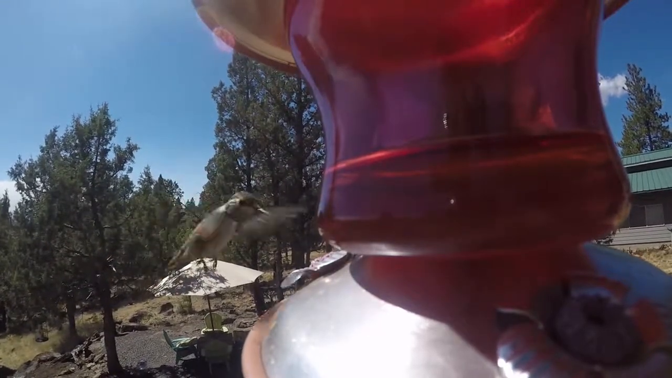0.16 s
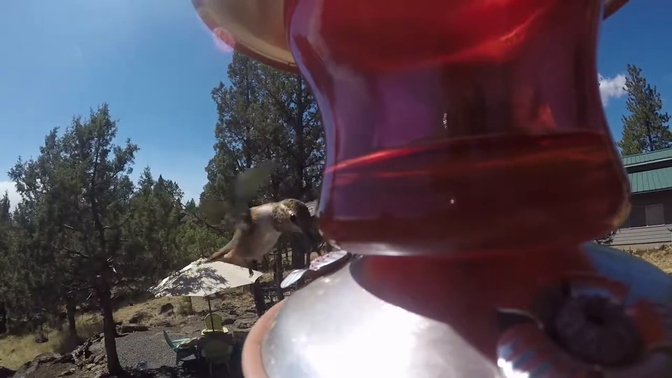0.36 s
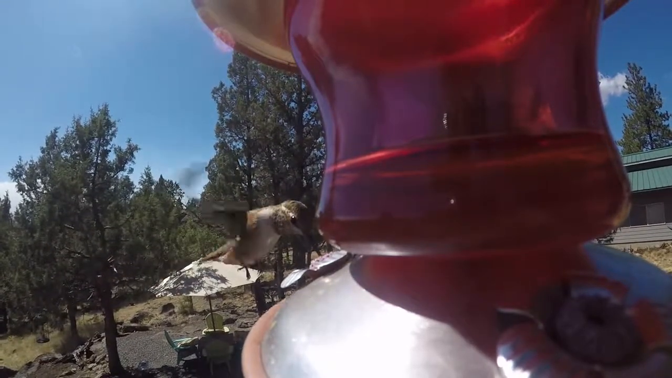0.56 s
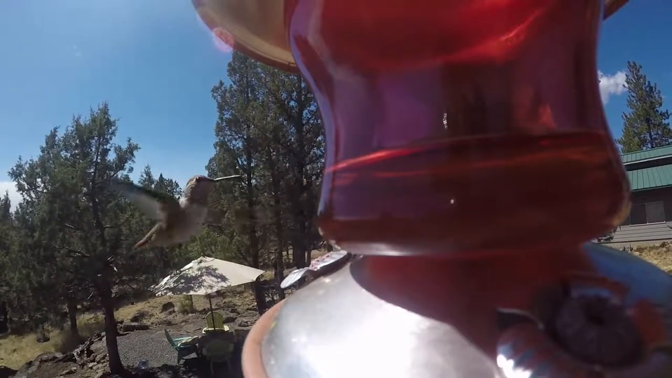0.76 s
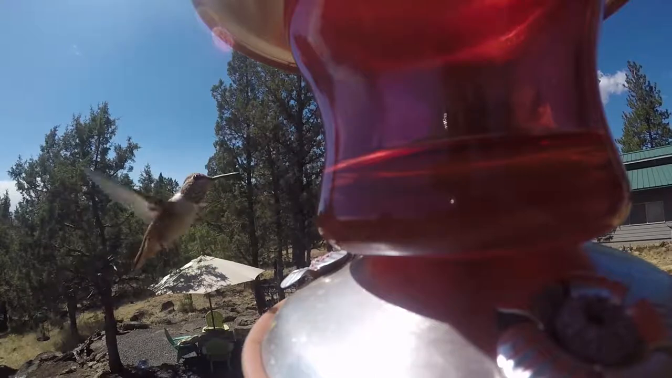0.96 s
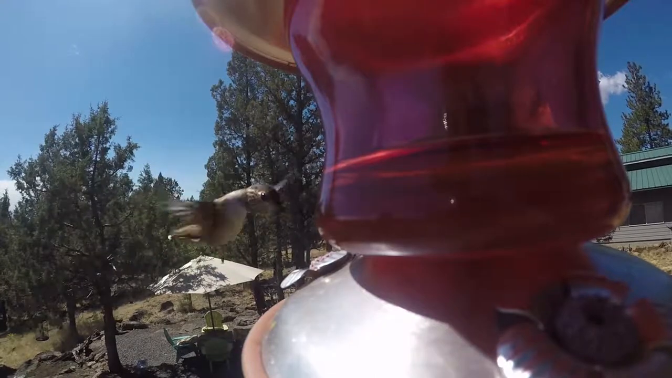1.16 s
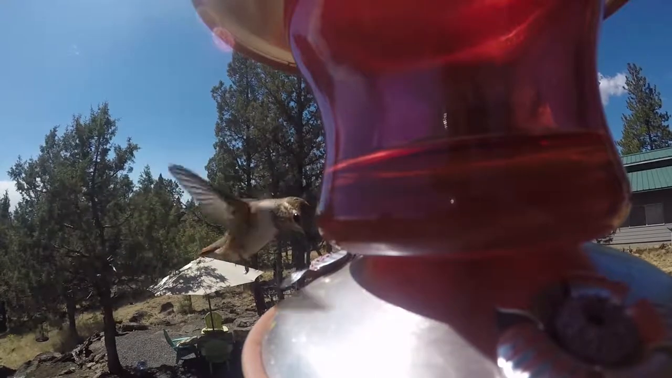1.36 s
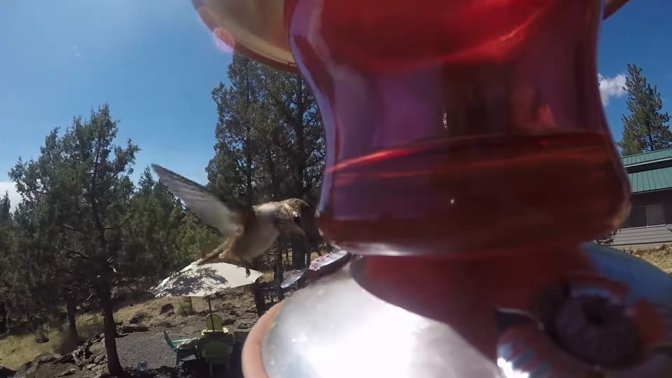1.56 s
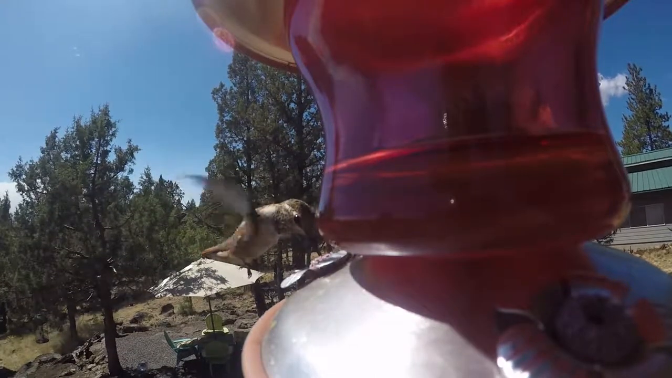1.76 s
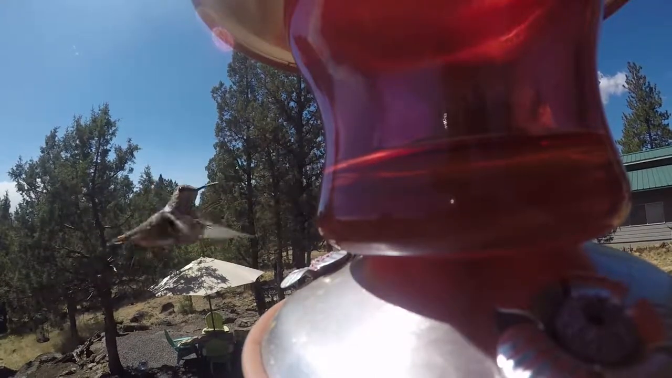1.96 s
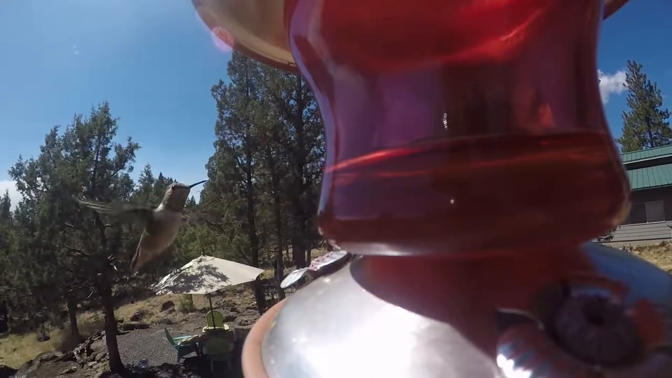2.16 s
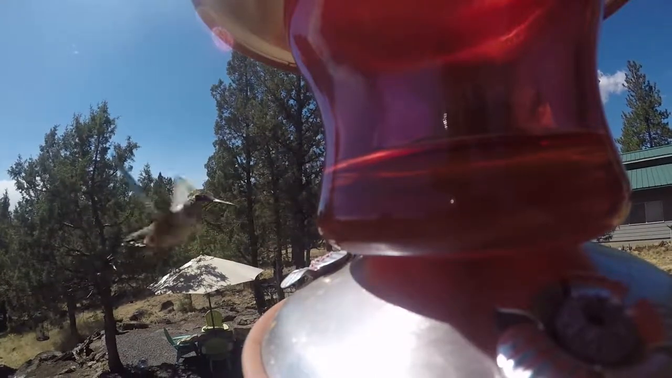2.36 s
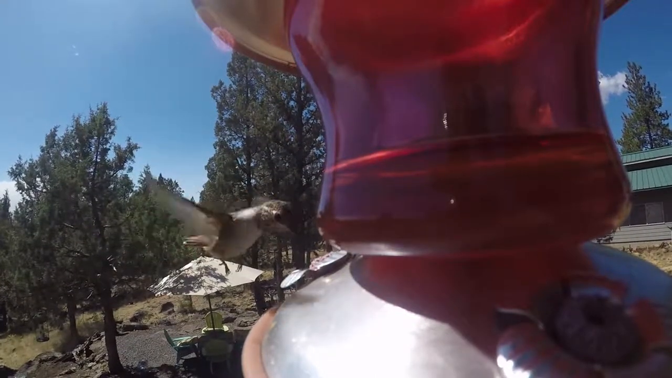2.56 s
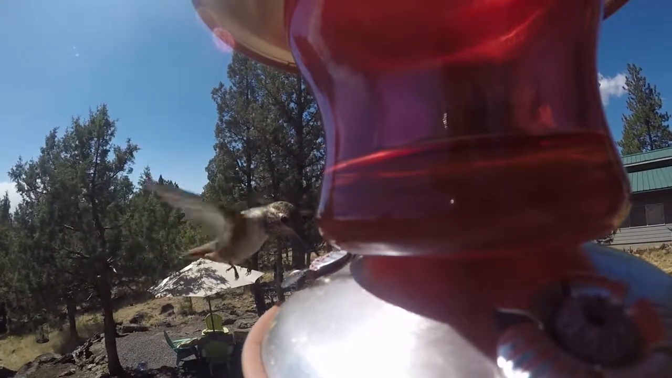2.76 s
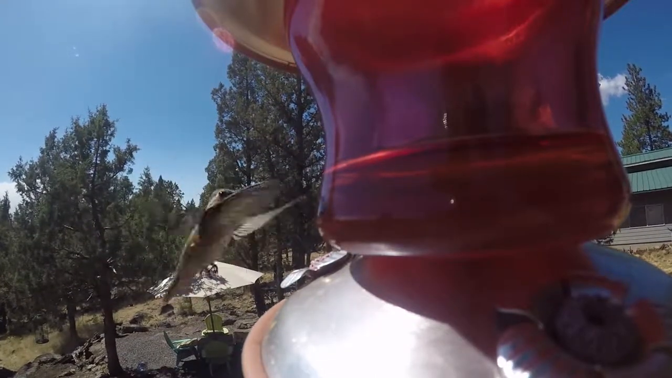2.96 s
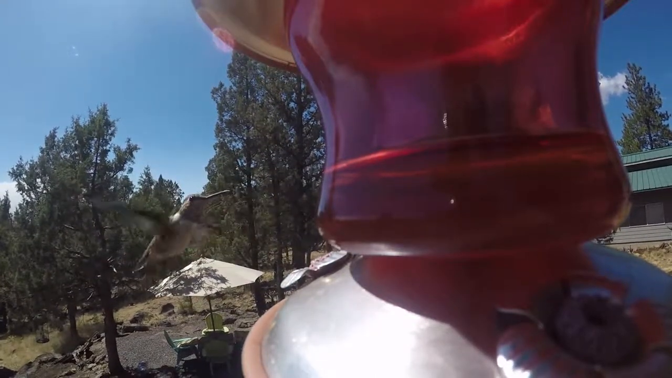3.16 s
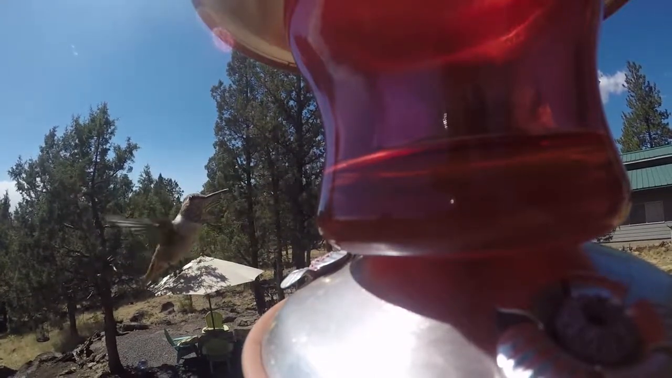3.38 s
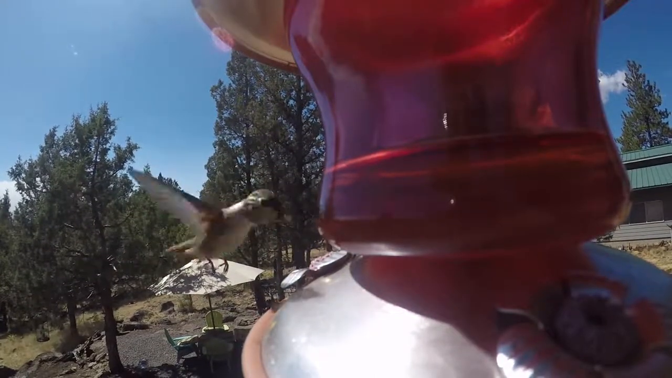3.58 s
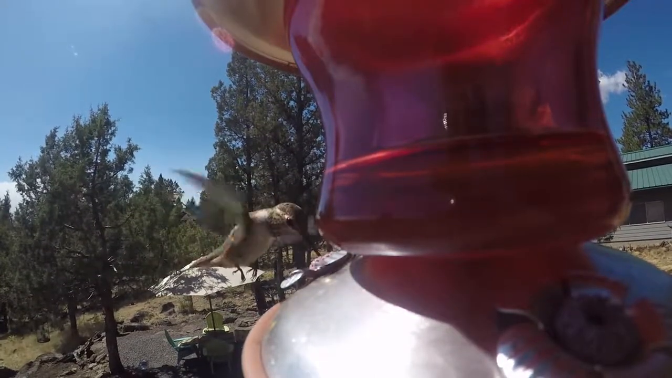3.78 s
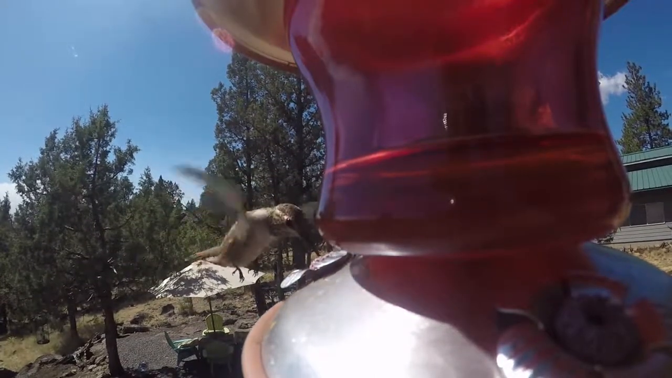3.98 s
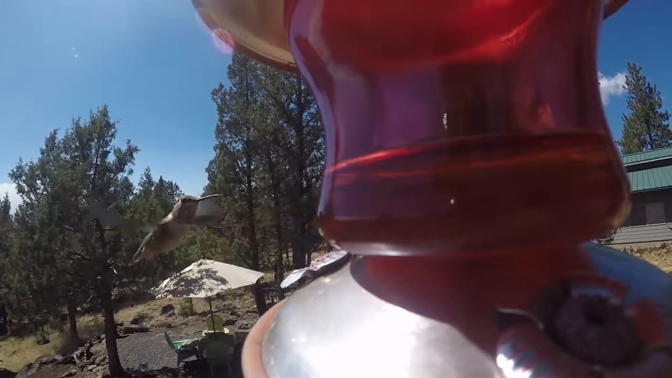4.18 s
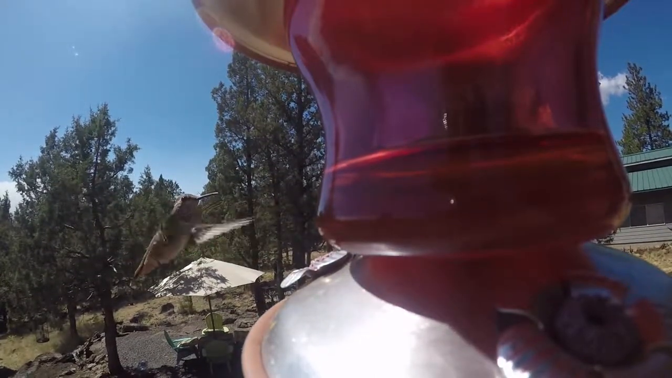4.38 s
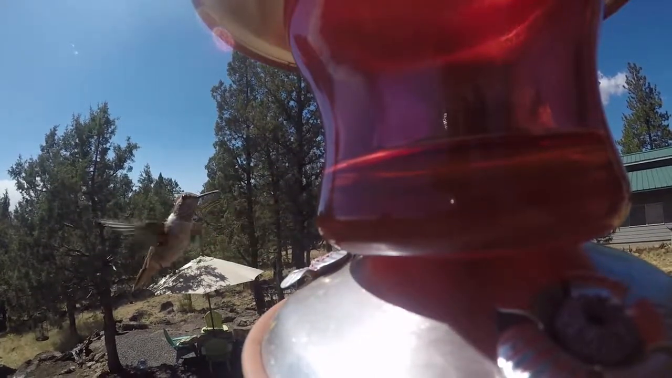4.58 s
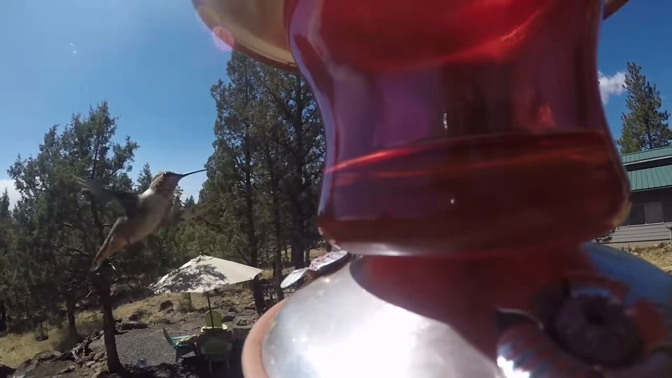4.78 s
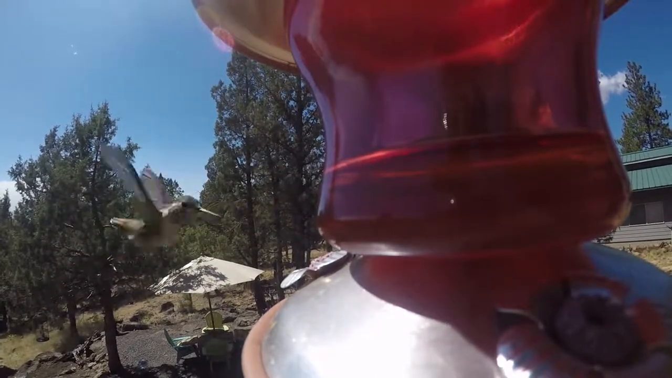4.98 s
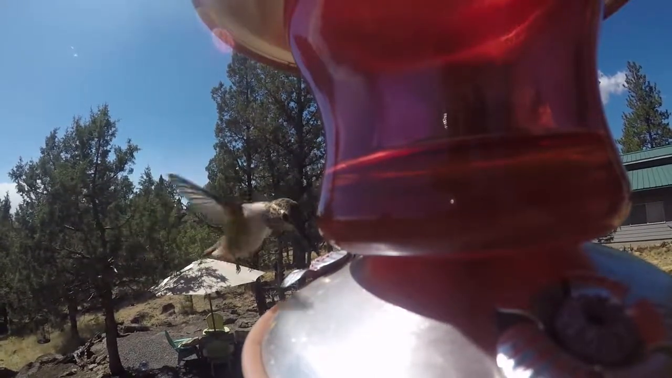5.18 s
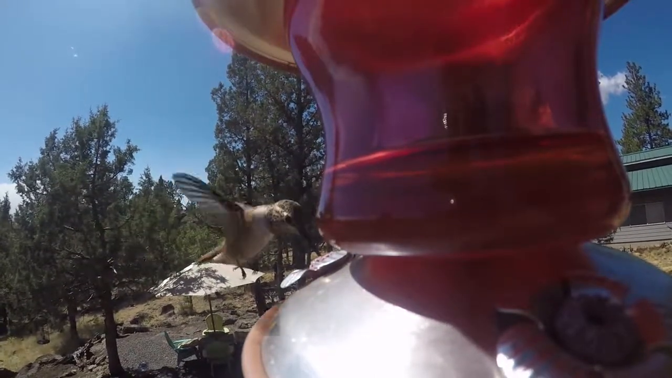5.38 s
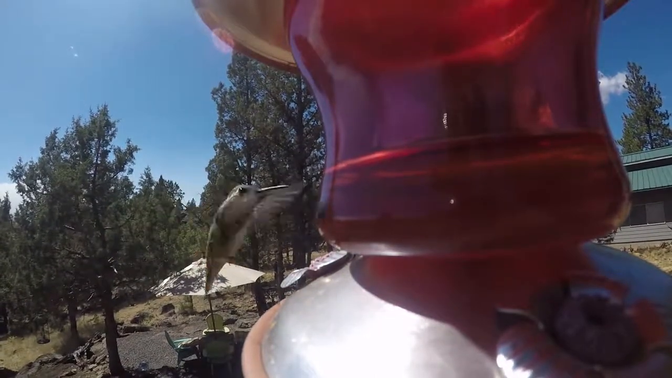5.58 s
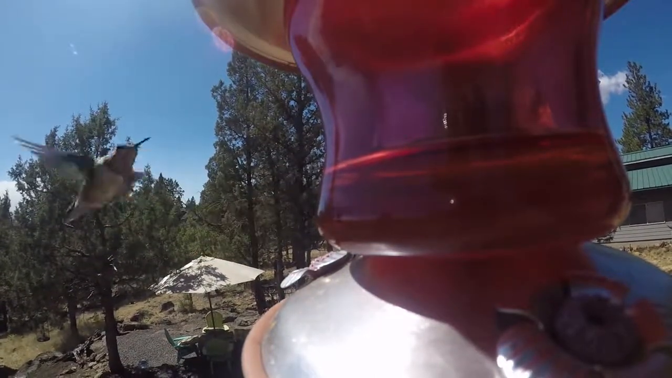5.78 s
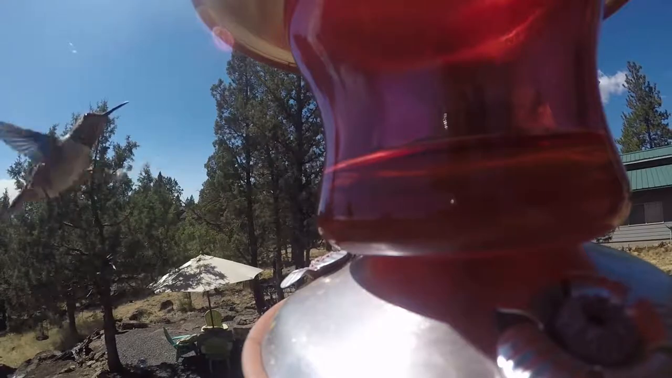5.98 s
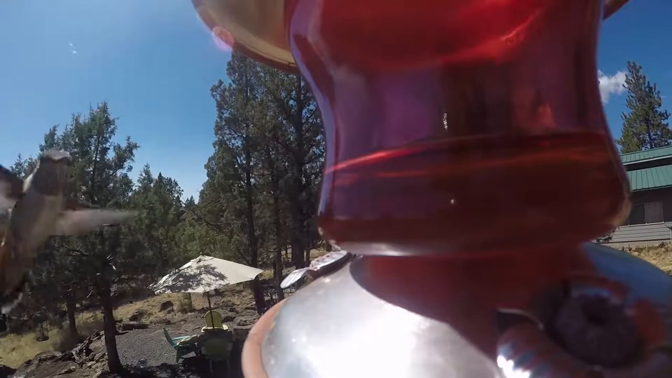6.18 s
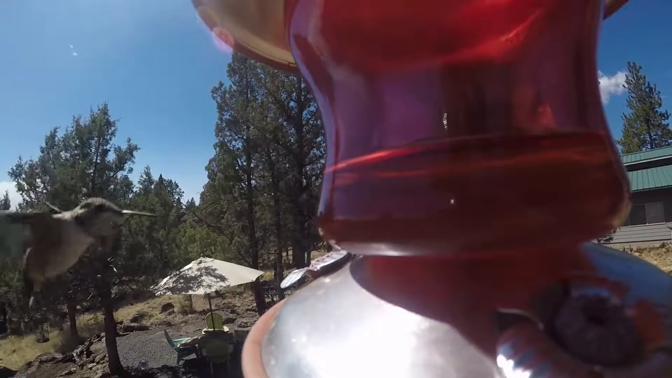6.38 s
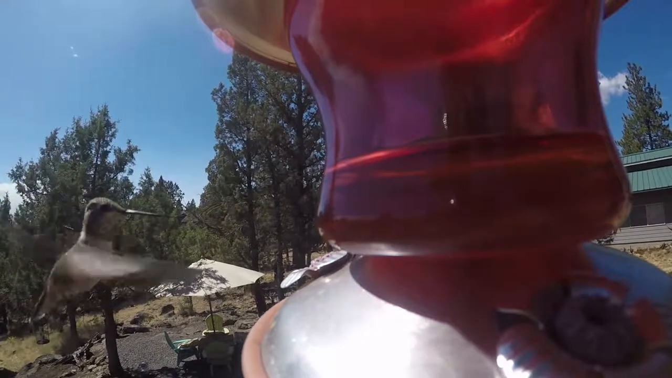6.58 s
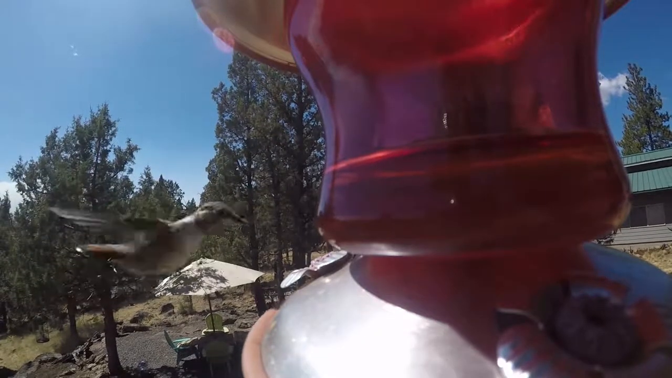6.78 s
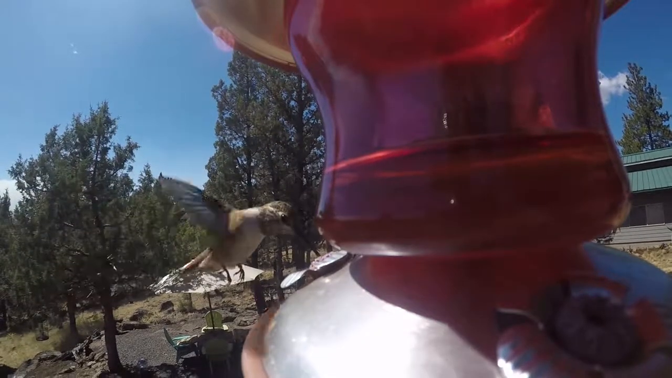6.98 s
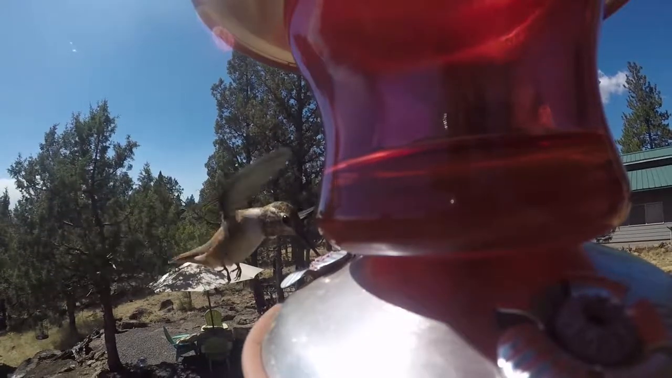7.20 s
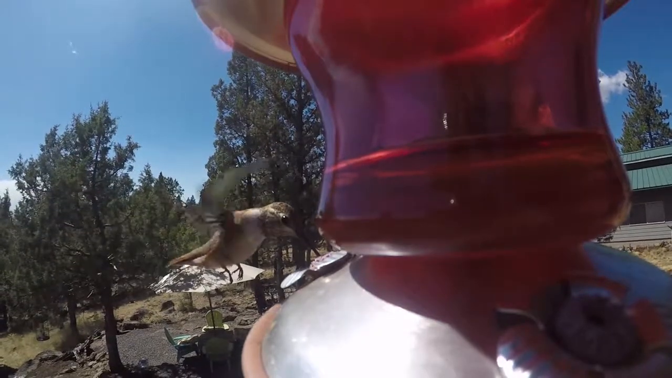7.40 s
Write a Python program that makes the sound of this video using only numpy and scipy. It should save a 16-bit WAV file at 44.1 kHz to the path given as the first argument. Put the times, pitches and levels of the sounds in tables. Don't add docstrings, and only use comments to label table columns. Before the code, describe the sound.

Outdoors, very close to a small camera microphone, a hummingbird hovers beside a feeder. Its low, fluttering wing hum swells and rises in pitch with each darting sip, then thins as it backs off. Ten brief, sharp chips punctuate it. A wing lightly knocks the feeder midway; later the bird banks past with louder, rawer flicks and settles into a long final sip. Faint hiss remains underneath.

```python
import sys
import numpy as np
from scipy import signal
from scipy.fft import rfft, irfft
from scipy.io import wavfile
from scipy.ndimage import uniform_filter1d

SR = 44100
rng = np.random.default_rng(int(sys.argv[2]) if len(sys.argv) > 2 else 0)


def invert_db(level):
    return 10 ** (np.asarray(level, dtype=float) / 20)


def dump_mix(stems):
    frames = np.atleast_2d(stems).T
    limited = np.clip(frames, -1, 1)
    pcm = np.round(limited * 32767).astype(np.int16)
    wavfile.write(sys.argv[1], SR, pcm)


N = 328104

# arrive_s, leave_s, brake_surge_hz, push_surge_hz, lift_db
SIPS = [
    (0.29, 0.648, 3.4, 4.62, -25.5),
    (1.246, 1.868, 4.12, 3.65, -26.5),
    (2.526, 2.925, 2.08, 4.226, -34),
    (3.686, 4.029, 2.61, 3.93, -32),
    (5.159, 5.56, 2.893, 6.48, -29),
    (6.854, 7.464, 1.21, 0.8, -25),
]
# from_s, to_s, beat_hz, flick_db, double_swing_db
HOVERS = [(-.05, 0.174, 47.65, -43, -31), (0.769, 1.133, 46.65, -47.5, -31.5),
          (2.125, 2.35, 46.24, -37, -44), (3.17, 3.34, 46.02, -42.5, -66), (3.413, 3.585, 47.5, -45, -52),
          (4.338, 4.56, 46.53, -35.5, -47), (4.566, 4.67, 46.95, -33.5, -32.5),
          (4.744, 5.042, 46.01, -42, -33.5), (5.678, 5.768, 46.12, -35, -39.5),
          (5.794, 6.076, 45.8, -28, -25.5), (6.171, 6.336, 46.33, -22.5, -24),
          (6.35, 6.439, 46.22, -24, -25), (6.45, 6.682, 47.19, -30.5, -27)]
# at_s, swing_db, double_swing_db, flick_db
TWISTS = [(0.76, -45, -34, -46), (1.1, -58, -39, -43), (1.72, -44, -68, -45), (2.04, -50, -40, -47),
          (2.99, -45, -32, -52), (3.64, -52, -51, -39), (4.1, -45, -27.5, -51), (5.23, -37, -67, -35),
          (5.411, -21.5, -49, -67), (5.45, -49, -32, -73), (5.64, -33, -30, -37), (6.111, -26, -30.5, -53),
          (6.73, -28, -16, -29)]
# at_s, extra_beat_hz
LUNGES = [
    (1.72, 0.93),
    (2.2, 0.9),
    (4.37, 1.28),
    (4.64, 1.22),
    (5.84, .8),
    (6.211, 4.84),
    (6.40, 1.56),
    (7.27, 1.23),
]
# at_s, level_db
NEARNESS = [(0, 0.5), (.45, -0.5), (.9, -1), (1.4, -1), (1.65, -1.5), (2.0, 0), (2.6, -1), (2.8, -2),
            (3.3, 2), (3.85, -3.5), (4.2, 0), (4.85, -5), (5.3, -3.5), (5.95, -1), (6.3, 0), (6.6, -1.5),
            (7.0, 0), (7.44, 0)]
# swing_db, double_swing_db, flick_db, snap_db
IDLE_DB = (-46.5, -43.5, -44, -52)
SURGE_DB_PER_HZ = (2.3, 0.82, 1.43, 1.4)
# multiple, layer_index (0 swing to 3 snap), level_db, pan_share, left_lag_rad
BEAT_MULTIPLES = [(1, 0, -1.5, 3, 0.97), (2, 1, -0.5, 0.23, 0.46), (3, 2, -2, 2.53, 0.27), (4, 2, -4, 3, 1),
                  (5, 3, -3, -5.9, 0.27), (6, 3, -5, -2, 0.76), (7, 3, -9.5, -0.7, 0.47), (8, 3, -9, 2, 1),
                  (9, 3, -14, -2.5, 0.33), (10, 3, -16, 3, 0.82), (11, 3, -20.5, 3.1, 0.54),
                  (12, 3, -25.5, 4, 0.55)]
FACING_DB = [0, 0, 1, 0, -10, 1.5, -1.5, .5, 0, .5, 0, 0]
# at_s, swing_rad, flick_rad
REBOUND = [(0, .85, 1.7), (5.6, .85, 1.7), (6.12, .5, 1.1), (6.42, .5, 1.1), (6.6, .7, 1.9),
           (7.44, .6, 1.9)]
# freq_hz, level_db_per_hz
DOWNWASH = [(12, -32), (25, -8), (45, -2.5), (80, -4), (150, -5), (300, -16), (500, -26), (900, -53.5)]
# freq_hz, level_db_per_hz
RUSTLE = [(150, -20), (300, 3), (500, 2), (700, -3), (1000, 0), (1500, -9), (2500, -15), (4000, -19),
          (7000, -25), (10000, -38), (16000, -70)]
# at_s, rustle_db
RUFFLES = [(0.521, -63), (1.3, -70), (1.64, -62), (2.48, -60), (2.572, -66), (3.52, -65), (3.87, -60),
           (5.08, -62), (5.391, -75), (5.471, -83), (6.22, -52), (6.38, -54), (6.74, -51)]
# start_s, peak_db, length_ms, knee_hz, head_left_minus_right_db
CHIPS = [
    (0.1716, -15, 20.3, 3250, 2.5),
    (0.7439, -13, 23.6, 3750, 4),
    (1.9516, -13.5, 22.3, 3560, 3),
    (2.4364, -16, 21, 3080, 3.5),
    (3.4939, -12, 21.2, 3580, 1.5),
    (4.1508, -14.5, 24.5, 3728, 3.5),
    (5.0224, -13, 22.4, 3620, 3),
    (5.6683, -13, 22.9, 3826, 3.5),
    (6.1529, -15, 22.65, 3300, -1),
    (6.7764, -15, 22.5, 3300, 4.5),
]
# freq_hz, level_db, db_per_head_db, db_per_knee_khz
BEAM = [(3300, -4.5, 1.99, -1.5), (5170, 2.5, -1.45, -11), (7700, -6, 0.87, -2.5)]
# freq_hz, left_db, right_db
PORTS = [(1460, -17, -18.5), (2290, -12, -9), (2600, -15, -8.5), (3250, -7, -2), (4300, -10.5, -9.5),
         (5150, -3, -7), (6400, 7, 1.5), (7200, -2.5, 0.5), (7690, 6.5, 8.5), (8100, -6.5, -4),
         (9670, -19.5, -4.5), (10700, -25, -14.5), (13400, -26.5, -16), (15800, -44.5, -39.5)]
# at_s, peak_db, pitch_hz, length_ms
BRUSHES = [
    (2.571, -30, 490, 5),
    (2.574, -26, 285, 8),
    (5.4, -43, 700, 2.9),
]
# freq_hz, correlation
LIKENESS = [(30, 0.19), (200, 0.12), (600, -0.6), (1400, -0.53), (3000, 0.6), (5000, 0.62), (7500, 0.093),
            (14000, 0.21)]
# freq_hz, left_db_per_hz, right_db_per_hz
HISS = [(600, -6, -29.5), (1310, 0.5, 1.5), (1800, 6, 6), (3600, -1, 2.5), (5000, -3, -8.5), (5360, -6, 2),
        (6100, 4.5, 2), (7200, 5.5, 5.5), (8100, -3, 1), (10240, -3, 1.5), (10470, -41, -0.5),
        (12000, -59.5, -8), (13400, -50, -23), (16000, -32, -38)]


def on_log(hz, table, column=1):
    table = np.array(table)
    return np.interp(np.log(hz + 1), np.log(table[:, 0]), table[:, column])


def colour(x, table, column=1):
    gain_db = on_log(np.fft.rfftfreq(N, 1 / SR), table, column)
    cepstrum = irfft(np.log(invert_db(gain_db)), N)
    cepstrum[1:N // 2] *= 2
    cepstrum[N // 2 + 1:] = 0
    return irfft(rfft(x) * np.exp(rfft(cepstrum)), N)


def treble(x, cutoff_hz):
    return signal.sosfilt(signal.butter(2, cutoff_hz, "high", fs=SR, output="sos"), x)


def automation(table):
    s, *curves = np.transpose(table)
    return [np.interp(np.arange(N) / SR, s, c) for c in curves]


def pan(db):
    return invert_db(np.array([db / 2, -db / 2]))


def held(from_s, to_s, release_s, ease_s=0.062):
    t = np.arange(N) / SR
    rise = (t - from_s[:, None]) / ease_s
    fall = (to_s[:, None] - t) / release_s
    ramp = np.clip(np.minimum(rise, fall) + .5, 0, 1)
    return ramp * ramp * (3 - 2 * ramp)


def bumps(s, rise_s, fall_s):
    since = np.arange(N) / SR - s[:, None]
    return np.exp(-(since / np.where(since < 0, rise_s, fall_s)) ** 2)


def per_beat(turns, spread):
    return spread * np.interp(turns, np.arange(500), rng.standard_normal(500))


def air_noise(table, lo_hz, hi_hz):
    hz = np.fft.rfftfreq(N, 1 / SR)
    alike = np.clip(on_log(hz, LIKENESS), -.95, .95)
    mid, side = rfft(rng.standard_normal((2, N))) * invert_db(on_log(hz, table))
    side = side * np.sqrt((1 - alike) / (1 + alike))
    band = (hz > lo_hz) & (hz < hi_hz)
    rms = np.sqrt(2 * np.sum(abs(mid[band]) ** 2)) / N
    return irfft(np.array([mid + side, mid - side]), N) / rms


def flight():
    sip_hz, idle_hz, idle_weight = 49.97, 45.8, .3
    lead_s, trail_s, retreat_s = .09, .09, 0.1974
    snap_db = -9
    arrive, leave, brake, push, lift_db = np.transpose(SIPS)
    from_s, to_s, hover_hz, flick_db, double_db = np.transpose(HOVERS)
    twist_s, *twist_db = np.transpose(TWISTS)
    lunge_s, lunge = np.transpose(LUNGES)
    sip = held(arrive - lead_s, leave + trail_s, retreat_s)
    hover = held(from_s, to_s, 0.062)
    surge = np.r_[brake, push, lunge] @ bumps(np.r_[arrive, leave, lunge_s], .04, .055)
    near = sip.sum(axis=0)

    idle = idle_weight * (1 - near)
    hz = (sip_hz * near + hover_hz @ hover + idle_hz * idle) / (near + hover.sum(axis=0) + idle) + surge

    same = np.ones(len(SIPS))
    sip_db = [lift_db - 7, lift_db, -38 * same, -47.5 * same]
    swing_db = flick_db + 1.5 + 0.54 * (double_db - flick_db)
    hover_db = [swing_db, double_db, flick_db, flick_db + snap_db]
    twist_db = [*twist_db, twist_db[-1] + snap_db]
    gains = invert_db(np.array(sip_db)) @ sip * invert_db(np.outer(SURGE_DB_PER_HZ, surge))
    gains = gains + invert_db(np.array(hover_db)) @ hover * invert_db(0.77 * surge)
    gains = gains + invert_db(np.array(twist_db)) @ bumps(twist_s, 0.034, 0.034)
    gains = gains + invert_db(np.array(IDLE_DB))[:, None]
    return hz, gains * invert_db(automation(NEARNESS)[0]), near, surge


def wings(hz, gains, near, surge):
    pan_hover_db, pan_sip_db, pan_db_per_hz = 1, 5, -0.12
    swing_lead, flick_lead = automation(REBOUND)
    turns = np.cumsum(hz) / SR
    turns = turns + per_beat(turns, .005)
    effort_db = per_beat(turns, .8) + np.array([per_beat(turns, .7) for _ in gains])
    pan_db = pan_hover_db + (pan_sip_db - pan_hover_db) * near + pan_db_per_hz * surge
    side_on_db = np.clip(20 * np.log10(gains[2] / gains[1]), 0, 15)
    tilt_db = 0.33 * side_on_db + per_beat(turns / 5, 1.6)
    out = np.zeros((2, N))
    for (k, layer, db, share, lag), facing_db in zip(BEAT_MULTIPLES, FACING_DB):
        lead = flick_lead if k > 1 else swing_lead
        phase = 2 * np.pi * k * turns + lead + per_beat(turns, .025 * k)
        wave = -np.cos(np.array([phase - lag / 2, phase + lag / 2]))
        db = db + (k > 2) * (-1) ** k * tilt_db + facing_db * near
        level = np.sqrt(2) * gains[layer] * invert_db(effort_db[layer] + db)
        out += level * pan(share * pan_db) * wave
    return out, turns


def chips():
    start_hz, fall_share = 8300, .18
    lead_share, lead_db, lead_hz, fade_share = .14, -32, 700, 0.17
    out = np.zeros((2, N))
    for s, db, ms, knee_hz, pan_db in CHIPS:
        high = knee_hz - 3550
        end_hz = 1906 + 0.28 * high
        over_db = -5 + 2.4 * (ms - 21.5)
        samples = ms * SR / 1000
        early = np.arange(int((1 + lead_share) * samples)) / samples - lead_share
        u = np.maximum(early, 0)
        before = np.maximum(-early, 0) / lead_share
        hz = knee_hz + (end_hz - knee_hz) * u
        hz = hz + (start_hz - knee_hz) * np.exp(-(u / fall_share) ** 1.52)
        hz = hz + lead_hz * before - 330 * u ** 5
        phase = 2 * np.pi * np.cumsum(hz) / SR
        shape = invert_db(lead_db * np.clip(before + 0.31 - u / 0.14, 0, 2))
        shape = shape * np.clip((1 - u) / fade_share, 0, 1) * invert_db(-7 * u)
        aimed = [(f, b + c * pan_db + d * high / 1000) for f, b, c, d in BEAM]
        beam = [(2200, 0), *aimed, (9500, 0)]
        voice = invert_db(on_log(hz, beam)) * np.sin(phase)
        for k in range(2, 6):
            over = invert_db(over_db - 4.2 * (k - 2) - 11.4 * u ** 2 + on_log(k * hz, beam))
            voice += over * (k * hz < .45 * SR) * np.sin(k * phase)
        flutter = uniform_filter1d(rng.standard_normal(1500), size=20)[:len(u)]
        voice *= 1 + 1.2 * flutter
        i = int((s - .0008 - lead_share * ms / 1000) * SR)
        out[:, i:i + len(u)] += invert_db(db - 0.5) * pan(pan_db)[:, None] * shape * voice

    late = np.exp(-1j * 0.74 / (1 + np.exp((5000 - np.fft.rfftfreq(N, 1 / SR)) / 300)))
    left = irfft(rfft(out[0]) * late, N)
    out = np.array([colour(left, PORTS, column=1), colour(out[1], PORTS, column=2)])

    t = np.arange(int(.08 * SR)) / SR
    both, *own = rng.standard_normal((3, len(t)))
    decay = invert_db(-60 * t / .06) + invert_db(6 - 60 * t / .012)
    smear = treble((both + .6 * np.array(own)) * decay * (t > .0004), 4500)
    return out + invert_db(-36) * signal.fftconvolve(out, smear, axes=1)[:, :N]


def brushes():
    t = np.arange(N) / SR
    out = np.zeros(N)
    for s, db, hz, ms in BRUSHES:
        out += invert_db(db) * np.sin(2 * np.pi * hz * t) * np.exp(-((t - s) / ms * 1000) ** 2)
    return out * pan(-3.4)[:, None]


def rustle(turns, near, surge):
    hover_db, sip_db, surge_db_per_hz, ruffle_width_s = -56, -53, 0.8, 0.027
    ruffle_s, ruffle_db = np.transpose(RUFFLES)
    steady_db = hover_db + (sip_db - hover_db) * near + surge_db_per_hz * surge * near
    ruffle = invert_db(ruffle_db) @ bumps(ruffle_s, ruffle_width_s, ruffle_width_s)
    level_db = 20 * np.log10(invert_db(steady_db) + ruffle)
    stroke = 2 * np.pi * (turns - .03)
    gate = 1 + 0.29 * np.cos(stroke) + 0.45 * np.cos(2 * stroke)
    noise = air_noise(RUSTLE, 583, 1430)
    noise = noise + (invert_db(0.2 * (level_db + 66.5)) - 1) * treble(noise, 1700)
    return invert_db(level_db - 2.5 + per_beat(2 * turns % 499, 1.56)) * gate * noise


def downwash(gains):
    wash_db = -43 + 0.31 * (20 * np.log10(gains.sum(axis=0)) + 22)
    return invert_db(wash_db - 5.5) * pan(2.85)[:, None] * air_noise(DOWNWASH, 66.84, 75.2)


def camera():
    frame_hz, whine_hz, whine_db, whine_pan_db, hiss_db = 59.94, 8546, -58.5, -15, -58.5
    frames = np.arange(N) / SR * frame_hz
    place = frames % 1
    chance = rng.standard_normal((500, 2))[frames.astype(int)]
    gate = np.clip((place - .18) / 0.31, 0, 1) * np.clip((.66 - place) / 0.053, 0, 1)
    tone = np.sin(2 * np.pi * (whine_hz * np.arange(N) / SR + chance[:, 1]))
    whine = gate * invert_db(2.2 * chance[:, 0]) * tone
    white = air_noise([(20, 0), (20000, 0)], 1000, 15500)
    hiss = np.array([colour(white[0], HISS, column=1), colour(white[1], HISS, column=2)])
    return invert_db(hiss_db) * hiss + invert_db(whine_db) * pan(whine_pan_db)[:, None] * whine


def scene():
    hz, gains, near, surge = flight()
    beat, turns = wings(hz, gains, near, surge)
    bird = beat + chips() + brushes()
    return bird + rustle(turns, near, surge) + downwash(gains) + camera()


def roll_off(x):
    return signal.sosfilt(signal.butter(12, 15320, fs=SR, output="sos"), x)


def record(dry):
    edge_hz, edge_spread_hz, keep_db = 13450, 480, -80
    hz, s, bins = signal.stft(np.tanh(1.3 * dry) / 1.3, SR, nperseg=1024)
    steps = uniform_filter1d(rng.standard_normal(len(s) // 2 + 1), size=3) * np.sqrt(3)
    edge = edge_hz + edge_spread_hz * np.repeat(steps, 2)[:len(s)]
    faint = uniform_filter1d(abs(bins).max(axis=0), size=12, axis=0) < invert_db(keep_db)
    bins = bins * np.where((hz[:, None] > edge) & faint, .01, 1)
    mix = signal.istft(bins, SR, nperseg=1024)[1][:, :N]
    return roll_off(mix)


dry = scene()
out = record(dry)
dump_mix(out)
```